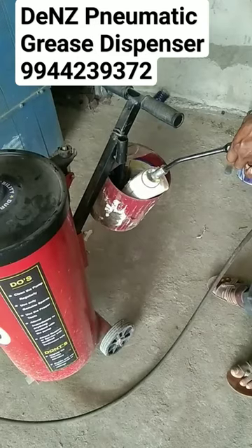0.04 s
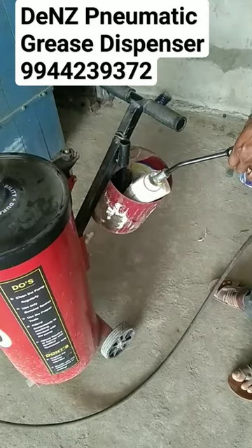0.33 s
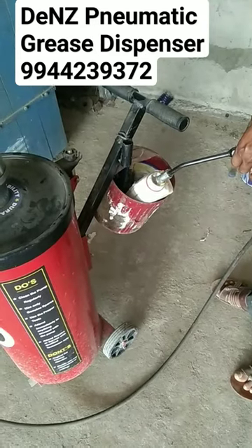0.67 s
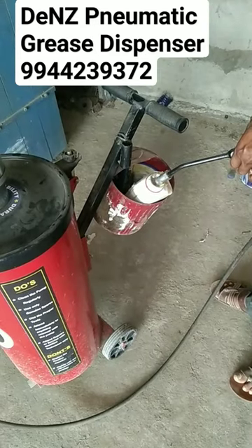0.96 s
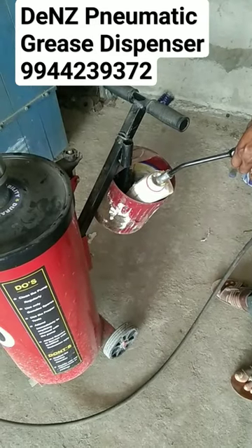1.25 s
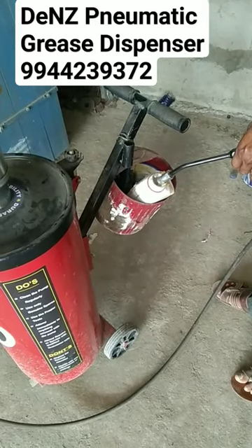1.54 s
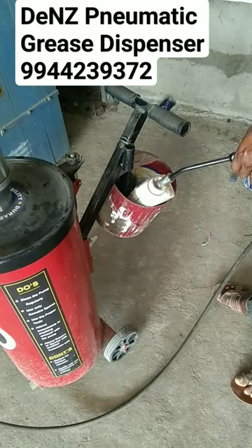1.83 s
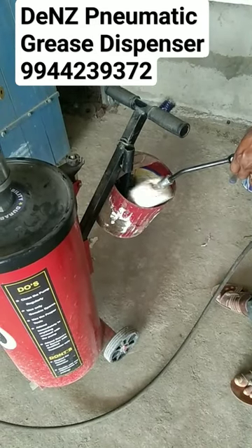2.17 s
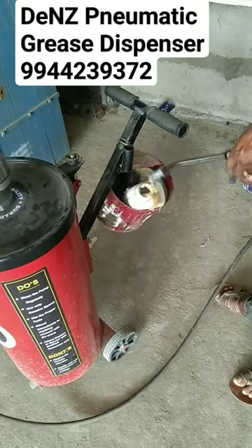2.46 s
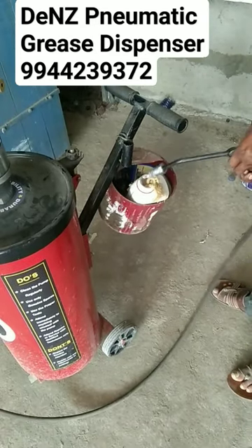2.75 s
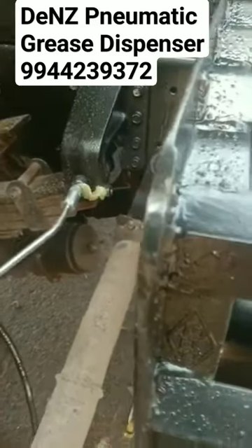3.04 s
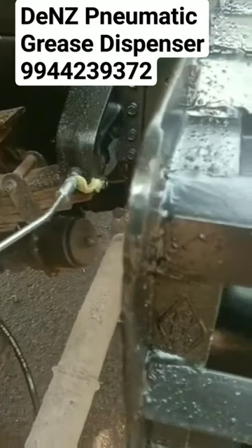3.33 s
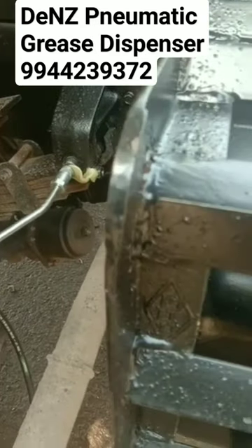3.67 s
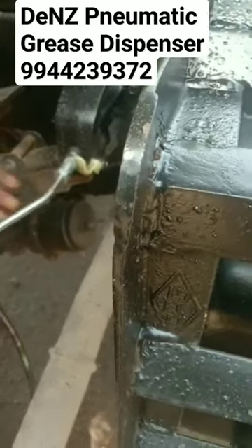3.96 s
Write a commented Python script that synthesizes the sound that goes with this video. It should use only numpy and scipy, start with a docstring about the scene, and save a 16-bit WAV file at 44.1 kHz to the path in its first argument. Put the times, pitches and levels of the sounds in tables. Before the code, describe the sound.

An air compressor chugs, then a grease gun hisses and splutters, ending in one sharp blast.

```python
"""A workshop: a piston compressor chugs at twelve turns a second; its intake hoots, valves clack, tank rings.
A pneumatic grease gun opens and the compressor drops back. Air hisses and whistles through the valve;
air pockets burst through the grease, spluttering from the nozzle into a tub.
Then, in a yard beside a lorry chassis, the gun gives one sharp hiss over a rumble and a distant whirr."""
import sys
import numpy as np
from scipy import signal
from scipy.fft import rfft, irfft
from scipy.io import wavfile

SR = 44100
rng = np.random.default_rng(int(sys.argv[2]) if len(sys.argv) > 2 else 0)


def pcm_store(signal):
    """Save signal as 16-bit PCM."""
    levels = np.round(np.clip(np.atleast_2d(signal), -1, 1) * 32767)
    wavfile.write(sys.argv[1], SR, levels.astype(np.int16).T)


N = 176400
T = np.arange(N) / SR

# workshop, then yard (start [s], end [s])
PLACE_SPANS = [(0.138, 2.978), (3.017, 3.994)]

# distant machinery (time [s], whirr [dB], rumble [dB])
YARD_LEVELS = [(3.02, -31, -35), (3.065, -28.5, -29), (3.095, -30, -35.5), (3.15, -36.5, -43.5),
               (3.25, -36.5, -39), (3.38, -44, -44), (3.44, -32.5, -37), (3.52, -29, -31), (3.72, -30, -32),
               (3.82, -31, -29), (3.92, -30, -28), (4.0, -28, -27)]
# its spectra and drone partials (frequency [Hz], level [dB])
WHIRR_SPECTRUM = [(200, -20), (420, -11), (600, -13), (950, -15), (1120, -6), (1250, 2), (1380, -6.5),
                  (1600, -13.5), (2700, -17), (3700, -14), (5500, -22.5), (6800, -35), (8000, -54),
                  (9900, -37.5), (12500, -63)]
RUMBLE_SPECTRUM = [(25, -16), (55, -11), (75, -8), (110, 3), (150, -3), (210, -2), (280, -8), (350, -22),
                   (700, -32), (2000, -71)]
DRONE_PARTIALS = [(200, -26.5), (530, -41), (772, -34), (1015, -40)]
DRONE_START_S, DRONE_RISE_S = 3.9, 0.094

TURN_S, FIRST_TURN_S = .08286, .0886
# intake hoots and their low body (delay [s], length [s], edge [s], pitch [Hz], sag [Hz/s], level [dB])
INTAKE_PULSES = [(0.0183, 0.0284, 0.0067, 306, 1000, -13), (.058, 0.019, 0.00614, 281.3, 520, -26.5),
                 (0.0402, 0.036, 0.013, 152.5, 1550, -30)]
# tank and frame (frequency [Hz], rms [dB], t60 [s])
TANK_MODES = [(83.9, -40.5, 0.88), (109.2, -32.5, 0.32), (157.6, -35, 0.89), (169, -40.5, 0.63),
              (208.6, -41.5, 0.45), (289.9, -30, 0.41), (360.1, -31, .7), (497.5, -32, 0.59),
              (519, -41, 0.25), (736.6, -39, 1), (784.6, -40, 0.56), (808, -40.5, 0.58), (838, -38.5, 0.66),
              (904, -38.5, 0.9), (972, -44, 0.35), (1113, -38, 1), (1235, -33.5, 0.64), (1480, -39, 0.18),
              (2027, -48.5, .2)]
KNOCK_DELAY_S, KNOCK_SPREAD_DB = .04, 2.5
# puffs, clacks (delay [s], attack [s], decay [s], centre [Hz], width [Hz], peak [dB], tone share [0-1])
VALVE_HITS = [(0.0, .007, 0.0062, 1260, 131, -20.5, .75), (.004, .005, .01, 2250, 594, -29, 0.4),
              (.047, 0.0063, 0.0089, 3684, 500, -27.5, .3), (.052, 0.019, .02, 1460, 200, -25, .3),
              (.0672, 0.001, 0.0032, 6050, 1000, -21.5, .6), (0.069, 0.0022, 0.004, 3800, 900, -25.5, 0.9),
              (.069, .002, 0.0022, 2119, 900, -19, 0.6), (.077, .002, 0.0052, 1970, 500, -23.5, 0.64),
              (0.0, 0.0036, .012, 6430, 500, -35, 0.4)]
# air swells through the valves (delay [s], sigma [s], boost [dB])
VALVE_RUSHES = [(0.0065, 0.01, 6), (.053, 0.013, 4), (0.0708, 0.0033, 5), (0.035, .009, -0.5)]
# valve air; crank and belt (frequency [Hz], level [dB])
VALVE_AIR_SPECTRUM = [(900, 0), (2000, 3.5), (3000, 0.5), (3900, 2.5), (4600, -1.5), (5400, -5),
                      (6100, 3.5), (6700, 2), (7800, -6), (10500, -11), (13000, -16.5), (15500, -19.5)]
CLATTER_SPECTRUM = [(40, -33), (58, -13), (80, 5), (120, 1), (200, -2.5), (300, -6), (430, 0.5), (540, 1.5),
                    (640, -7.5), (850, -0.5), (1030, -7.5), (1450, 2.5), (1800, -7.5), (3000, -17)]
VALVE_AIR_DB, CLATTER_DB, CLATTER_REPEAT_SHARE, CLATTER_TOP_HZ = -30.5, -25, .6, 2620
DUCK_START_S, DUCK_FALL_S, DUCK_DB = 2.358, 0.055, -14.5

# gun hiss at the tub (time [s], level [dB])
HISS_LEVELS = [(2.36, -52), (2.376, -21.5), (2.392, -15.5), (2.47, -19.5), (2.5, -21.5), (2.6, -20.5),
               (2.69, -18.5), (2.73, -22), (2.82, -20.5), (2.88, -21.5), (2.92, -21), (2.975, -26.5)]
# its colour (frequency [Hz], level [dB])
HISS_SPECTRUM = [(100, -34), (1000, -13.5), (2500, -10.5), (3800, -2.5), (4400, 3), (5200, -1.5),
                 (6500, -2.5), (8500, -7), (10000, -7.5), (13000, -10.5), (15500, -7.5)]
# valve whistles, higher when further open (time [s], pitch [Hz], level [dB], narrow share [0-1])
HISS_WHISTLE = [(2.37, 4200, -45, .1), (2.386, 4200, -27, 0.94), (2.394, 4300, -15, .95),
                (2.404, 4500, -24, 0.9), (2.416, 5700, -17, .4), (2.472, 6900, -19, 0.4),
                (2.5, 8000, -52, 0.1), (2.62, 9000, -39, 0.1), (2.69, 8000, -21.5, .05),
                (2.73, 9000, -52, 0.1), (2.83, 8800, -29, 0.2), (2.88, 7800, -20, .2),
                (2.925, 6300, -21.5, .3), (2.97, 4500, -33, .1)]
BLAST_WHISTLE = [(3.095, 5200, -60, .8), (3.103, 6340, -21, .8), (3.111, 8600, -35, .7),
                 (3.122, 15000, -27, 0), (3.175, 14300, -30, .05), (3.22, 12000, -48, 0),
                 (3.29, 11600, -32, 0), (3.335, 13000, -43, 0), (3.358, 11560, -33, .2),
                 (3.372, 9830, -23, .8), (3.39, 8000, -39, .8), (3.412, 6300, -25, .9),
                 (3.428, 5200, -50, .9)]
BREATHY_WIDTH_HZ, HISS_FLUTTER_DB, BLAST_FLUTTER_DB = 1700, 0.6, 1.24
# grease spurts (start [s], length [s], level [dB])
GREASE_SPURTS = [(2.481, .205, -17), (2.709, .15, -18), (2.968, 0.089, -25)]
FIRST_POPS_PER_S, LAST_POPS_PER_S, SLOWING_POWER = 4000, 220, 3.0
FIRST_POP_HZ, LAST_POP_HZ, POP_LOG_SPREAD, POP_DECAY_PER_CYCLE = 2760, 242, 0.65, 3.1
SPIT_DB, SPIT_DECAY_S, SPURT_FADE_DB, POP_SPREAD_DB = 3.5, .012, -7.5, 4
# last big air pockets (start [s], pitch [Hz], t60 [s], level [dB])
DEEP_PLOPS = [(2.663, 230, .018, -16), (2.671, 303, 0.012, -16), (2.687, 210, 0.019, -19),
              (2.807, 298, 0.016, -19), (2.823, 173, 0.019, -26), (2.847, 169, 0.024, -14),
              (2.854, 109, 0.052, -13.5), (2.864, 80.6, 0.033, -23)]
# low flutter of the grease jet (frequency [Hz], level [dB])
JET_SPECTRUM = [(50, -10), (90, 4), (160, 2), (300, -9), (700, -30)]
JET_DB = -32.5
# tub and gun tube (frequency [Hz], width [Hz], level re pops [dB])
TUB_MODES = [(145, 12, -17.5), (368, 25, -25), (525, 20, -31), (720, 10, -33), (790, 8.3, -34),
             (1162, 20, -27), (1900, 28, -20), (4210, 42, -16)]

# gun blast at the lorry (time [s], body [dB], treble [dB])
BLAST_LEVELS = [(3.094, -72, -80), (3.102, -16.5, -37), (3.122, -15, -24), (3.17, -15.5, -26),
                (3.22, -17.5, -27), (3.29, -16, -25.5), (3.34, -15, -28), (3.392, -20, -35),
                (3.412, -19, -35), (3.43, -28, -47), (3.49, -39, -60), (3.6, -71, -85)]
# its two bands (frequency [Hz], level [dB])
BLAST_BODY_SPECTRUM = [(500, -35), (1800, -18), (2600, -12), (3000, -6.5), (3500, -2.5), (4400, 0.5),
                       (5500, -2.5), (6100, -13), (6900, -8.5), (8000, -26), (12000, -45)]
BLAST_TREBLE_SPECTRUM = [(5000, -30), (8000, -7), (9200, 3.5), (10000, 5), (11500, -2.5), (12800, -12),
                         (13800, -10), (14500, -1), (15500, -5)]
# its sputter (time [s], sigma [s], boost [dB])
BLAST_SURGES = [(3.112, .004, -3.5), (3.182, .004, -0.5), (3.21, .004, 4), (3.224, 0.0043, 2.5),
                (3.241, 0.0032, 5), (3.26, .006, -2.5), (3.296, .004, 1.5), (3.381, .002, -3),
                (3.389, .005, 4.5)]
# exhaust resonances (frequency [Hz], width [Hz], level [dB])
EXHAUST_MODES = [(2960, 62, -23), (3550, 150, -12), (3700, 30, -23), (4020, 30, -27), (4430, 18, -11),
                 (4650, 140, -16), (5070, 39, -14), (5460, 200, -17)]

ECHO_DB, ECHO_DECAY_S, ECHO_ABOVE_HZ = -7, 0.0055, 2260


def from_db(db):
    """Decibels to gain."""
    return 10 ** (np.asarray(db) / 20)


def unit_rms(x):
    """Scale to rms 1."""
    return x / np.sqrt(np.mean(x ** 2) + 1e-20)


def curves(rows):
    """Each column of a time table at every sample."""
    times_s, *columns = np.transpose(rows)
    return [np.interp(T, times_s, column) for column in columns]


def ramp(x):
    """Smooth step from 0 to 1."""
    return np.sin(np.pi / 2 * np.clip(x, 0, 1)) ** 2


def blend(a, b, share):
    """Mix unrelated sounds; share is a's part of the power."""
    share = np.clip(share, 0, 1)
    return np.sqrt(share) * a + np.sqrt(1 - share) * b


def butter(x, hz, kind="low"):
    """Butterworth filter, 12 dB per octave."""
    return signal.sosfilt(signal.butter(2, hz, kind, fs=SR, output="sos"), x)


def coloured(spectrum, source=None):
    """Noise, or a given source, shaped by a spectrum; rms 1."""
    hz, db = np.transpose(spectrum)
    bins_hz = np.maximum(np.arange(N // 2 + 1) * SR / N, 1)
    gain = from_db(np.interp(np.log(bins_hz), np.log(hz), db)) * np.minimum(bins_hz / hz[0], 1)
    return unit_rms(irfft(rfft(rng.standard_normal(N) if source is None else source) * gain, N))


def drift(rate_hz):
    """Random wander; rms 1."""
    return unit_rms(butter(rng.standard_normal(N + SR), rate_hz)[SR:])


def narrow_noise(hz, width_hz):
    """Turbulence in a resonance whose centre may move; rms 1."""
    phase = 2 * np.pi * np.cumsum(hz + np.zeros(N)) / SR
    return unit_rms(drift(width_hz / 2) * np.cos(phase) + drift(width_hz / 2) * np.sin(phase))


def ring(drive, hz, t60_s):
    """One decaying mode, driven within an octave of its pitch; rms 1."""
    radius = np.exp(-np.log(1000) / (t60_s * SR))
    feedback = [1, -2 * radius * np.cos(2 * np.pi * hz / SR), radius ** 2]
    return unit_rms(signal.lfilter([1, -2, 1], feedback, butter(drive + 1e-18, [hz / 2, hz * 2], "band")))


def scattered_noise(spectrum):
    """Air noise plus short treble reflections from floor, walls and steel; rms 1."""
    direct = coloured(spectrum)
    age_s = T[:SR // 10]
    cloud = butter(rng.standard_normal(len(age_s)), ECHO_ABOVE_HZ, "high") * np.exp(-age_s / ECHO_DECAY_S)
    echo = signal.fftconvolve(direct, cloud / np.linalg.norm(cloud))[:N]
    return unit_rms(direct + from_db(ECHO_DB) * echo)


def crank_age_s(delay_s):
    """Time since the crank last passed a point of its turn."""
    return (T - FIRST_TURN_S - delay_s) % TURN_S


def distant_machinery():
    """A whirr, a lumpy rumble and a late, swelling drone."""
    drone = 0
    for hz, db in DRONE_PARTIALS:
        wavering_hz = hz * (1 + 0.0249 * drift(44.6))
        drone += from_db(db) * np.sqrt(2) * np.sin(2 * np.pi * np.cumsum(wavering_hz) / SR)
    whirr_db, rumble_db = curves(YARD_LEVELS)
    whirr = from_db(whirr_db + 0.95 * drift(32)) * coloured(WHIRR_SPECTRUM)
    rumble = from_db(rumble_db + 1.5 * drift(29)) * coloured(RUMBLE_SPECTRUM)
    return whirr + rumble + drone * ramp((T - DRONE_START_S) / DRONE_RISE_S)


def intake():
    """Each turn the intake pipe hoots, with a lower body beneath, sagging in pitch."""
    out = 0
    for delay_s, length_s, edge_s, hz, sag_hz_per_s, db in INTAKE_PULSES:
        age_s = crank_age_s(delay_s - edge_s / 2)
        envelope = ramp(age_s / edge_s) * ramp((length_s + edge_s - age_s) / edge_s)
        out += from_db(db) * envelope * np.sin(2 * np.pi * (hz - sag_hz_per_s * age_s / 2) * age_s)
    return out * from_db(0.61 * drift(9.6))


def tank():
    """One knock a turn rings tank and frame, each mode with varying force."""
    knocks = np.diff(crank_age_s(KNOCK_DELAY_S), prepend=0) < 0
    out = 0
    for hz, db, t60_s in TANK_MODES:
        force = knocks * from_db(KNOCK_SPREAD_DB * rng.standard_normal(N))
        out += from_db(db) * ring(force, hz, t60_s)
    return out


def valves():
    """Puffs and clacks at set crank angles, over air that swells with each stroke."""
    hits, swell_db = 0, 0
    for delay_s, attack_s, decay_s, hz, width_hz, db, tone_share in VALVE_HITS:
        age_s = crank_age_s(delay_s)
        tone = np.sqrt(2) * np.sin(2 * np.pi * hz * age_s)
        envelope = ramp(age_s / attack_s) * np.exp(-np.maximum(age_s - attack_s, 0) / decay_s)
        hits += from_db(db) * envelope * blend(tone, narrow_noise(hz, width_hz), tone_share)
    for delay_s, sigma_s, db in VALVE_RUSHES:
        offset_s = crank_age_s(delay_s - TURN_S / 2) - TURN_S / 2
        swell_db += db * np.exp(-.5 * (offset_s / sigma_s) ** 2)
    return hits + from_db(VALVE_AIR_DB + swell_db) * scattered_noise(VALVE_AIR_SPECTRUM)


def clatter():
    """Crank and belt noise; part repeats every turn."""
    one_turn = irfft(np.exp(2j * np.pi * rng.random(round(TURN_S * SR) // 2 + 1)))
    source = blend(unit_rms(np.resize(one_turn, N)), rng.standard_normal(N), CLATTER_REPEAT_SHARE)
    return from_db(CLATTER_DB) * butter(coloured(CLATTER_SPECTRUM, source), CLATTER_TOP_HZ)


def whistle(track, width_hz):
    """Edge tone of the air valve, from broad rush to thin line."""
    hz, db, narrow_share = curves(track)
    tone = blend(narrow_noise(hz, width_hz), narrow_noise(hz, BREATHY_WIDTH_HZ), narrow_share)
    return from_db(db) * tone * (T > track[0][0]) * (T < track[-1][0])


def splutter():
    """Air pockets burst through grease: a spit, then deeper, rarer pops as pressure falls."""
    out, age_s = np.zeros(N + SR), T[:SR // 40]
    for start_s, length_s, db in GREASE_SPURTS:
        elapsed_s = 0
        for gap, size, pitch in rng.standard_normal((1500, 3)):
            if elapsed_s > length_s:
                break
            spent = (elapsed_s / length_s) ** SLOWING_POWER
            pops_per_s = FIRST_POPS_PER_S * (LAST_POPS_PER_S / FIRST_POPS_PER_S) ** spent
            centre_hz = FIRST_POP_HZ * (LAST_POP_HZ / FIRST_POP_HZ) ** spent
            hz = min(centre_hz * np.exp(POP_LOG_SPREAD * pitch), SR / 4)
            pop = np.exp(-POP_DECAY_PER_CYCLE * hz * age_s) * np.sin(2 * np.pi * hz * age_s)
            pop *= np.sqrt(SR / pops_per_s / np.sum(pop ** 2))  # same power at any rate
            spit_db = SPIT_DB * np.exp(-elapsed_s / SPIT_DECAY_S)
            pop_db = db + spit_db + SPURT_FADE_DB * spent + POP_SPREAD_DB * np.tanh(size)
            i = int((start_s + elapsed_s) * SR)
            out[i:i + len(pop)] += rng.choice([-1, 1]) * from_db(pop_db) * pop
            elapsed_s += np.exp(.4 * gap) / pops_per_s
    return butter(out[:N], 75, "high")


def plops():
    """Big air pockets burst over the low flutter of the grease jet."""
    bursts = 0
    for start_s, hz, t60_s, db in DEEP_PLOPS:
        age_s = np.maximum(T - start_s, 0)
        envelope = from_db(db - 60 * age_s / t60_s) * ramp(age_s / 0.00062)
        bursts += envelope * np.sqrt(2) * np.cos(2 * np.pi * hz * age_s)
    flow = sum(ramp((T - start_s) / .004) * ramp((start_s + length_s - T) / 0.011)
               for start_s, length_s, _ in GREASE_SPURTS)
    return butter(bursts + from_db(JET_DB) * flow * coloured(JET_SPECTRUM), 60, "high")


def gun_at_tub():
    """The open nozzle hisses, whistles and splutters; the pops ring tub and tube."""
    pops = splutter() + plops()
    tub = np.std(pops) * sum(from_db(db) * ring(pops, hz, t60_s=np.log(1000) / (np.pi * width_hz))
                             for hz, width_hz, db in TUB_MODES)
    hiss_db, = curves(HISS_LEVELS)
    hiss = from_db(hiss_db + HISS_FLUTTER_DB * drift(80)) * scattered_noise(HISS_SPECTRUM)
    return hiss + whistle(HISS_WHISTLE, width_hz=310) + pops + tub


def gun_at_lorry():
    """One fluttering, whistling air blast through the exhaust's resonances."""
    body_db, treble_db = curves(BLAST_LEVELS)
    body_db += sum(db * np.exp(-.5 * ((T - at_s) / sigma_s) ** 2) for at_s, sigma_s, db in BLAST_SURGES)
    rush = scattered_noise(BLAST_BODY_SPECTRUM)
    exhaust = sum(from_db(db) * narrow_noise(hz, width_hz) for hz, width_hz, db in EXHAUST_MODES)
    body = from_db(body_db) * unit_rms(rush + exhaust)
    treble = from_db(treble_db) * scattered_noise(BLAST_TREBLE_SPECTRUM)
    flutter = from_db(BLAST_FLUTTER_DB * drift(90))
    return (body + treble) * flutter + whistle(BLAST_WHISTLE, width_hz=300)


def scene():
    """Workshop, short gap, yard, over a faint noise floor; mono."""
    duck = from_db(DUCK_DB * ramp((T - DUCK_START_S) / DUCK_FALL_S))
    compressor = intake() + tank() + valves() + clatter()
    workshop = compressor * duck + gun_at_tub()
    yard = distant_machinery() + gun_at_lorry()
    mix = from_db(-87) * coloured([(30, -2), (300, -18), (8000, -50)])
    for place, (start_s, end_s) in zip((workshop, yard), PLACE_SPANS):
        mix += place * ramp((T - start_s) / 0.015 + .5) * ramp((end_s - T) / 0.015 + .5)
    return mix[None]


def record(dry):
    """Soft clip, then a steep low-pass."""
    lowpass = signal.ellip(12, .1, 80, 15480, fs=SR, output="sos")
    return signal.sosfilt(lowpass, 1.225 * np.tanh(dry / 1.178))


dry = scene()
out = record(dry)
pcm_store(out)
```